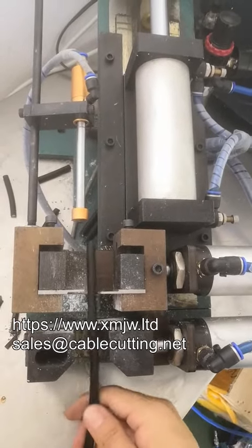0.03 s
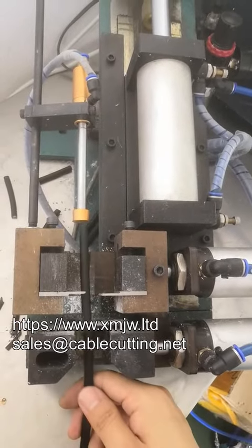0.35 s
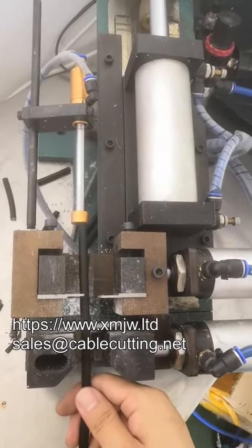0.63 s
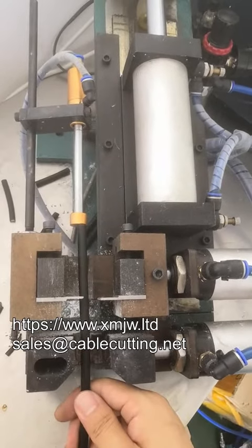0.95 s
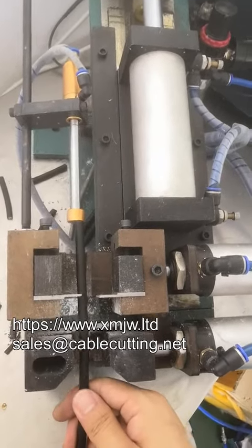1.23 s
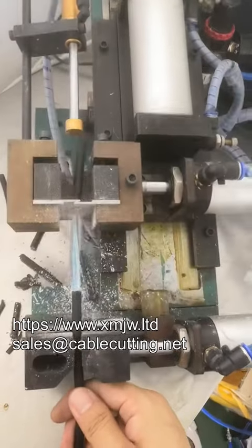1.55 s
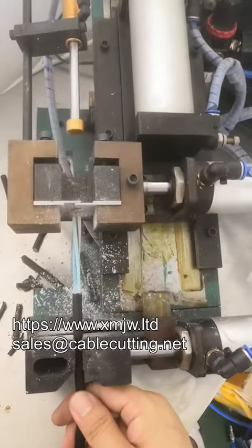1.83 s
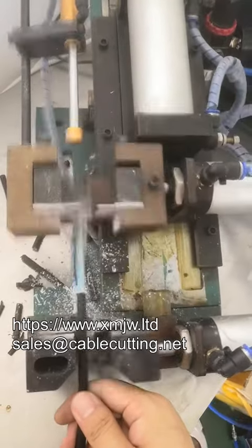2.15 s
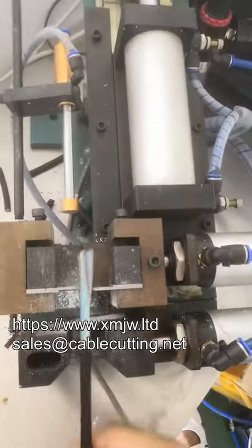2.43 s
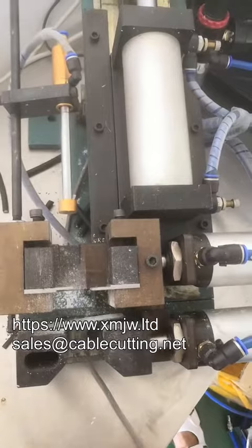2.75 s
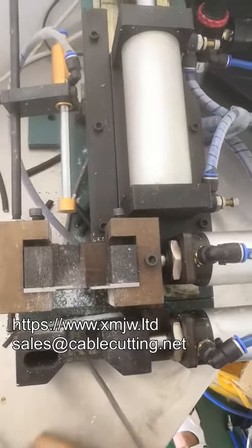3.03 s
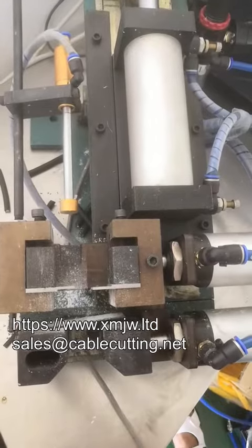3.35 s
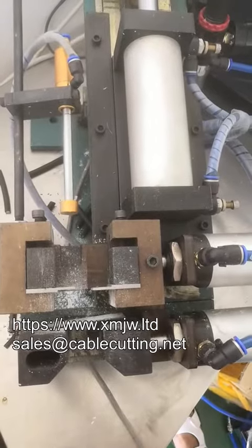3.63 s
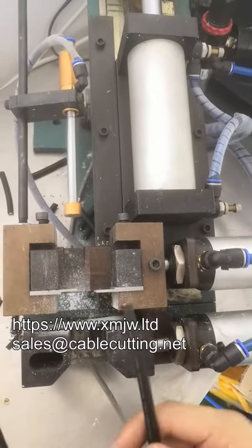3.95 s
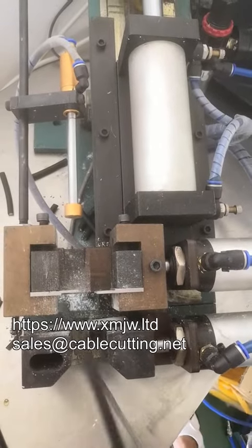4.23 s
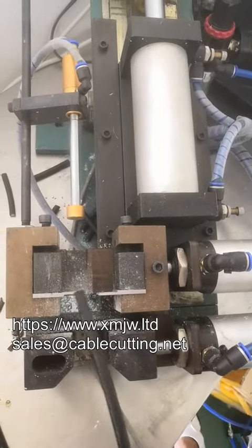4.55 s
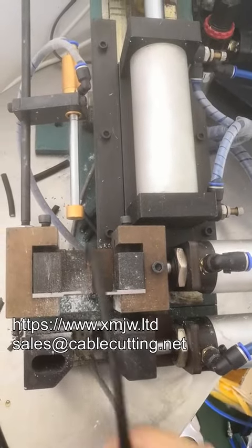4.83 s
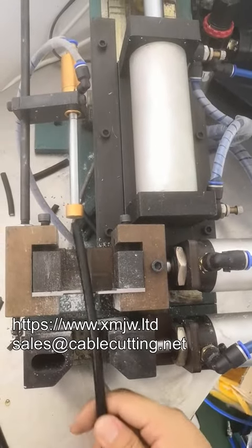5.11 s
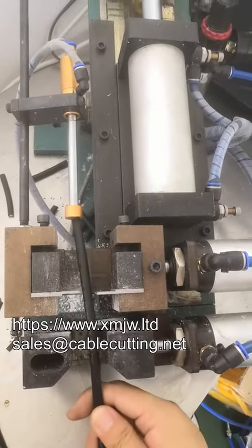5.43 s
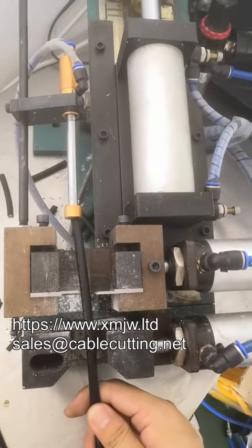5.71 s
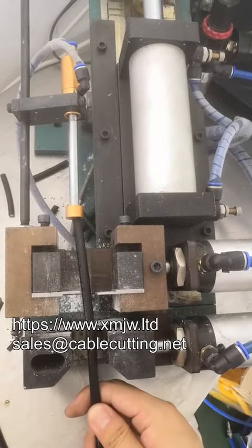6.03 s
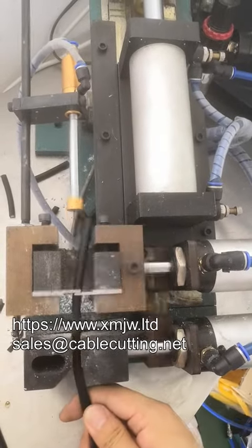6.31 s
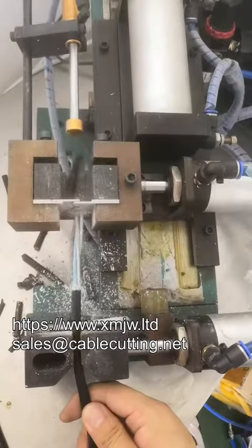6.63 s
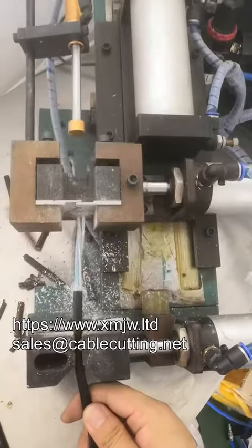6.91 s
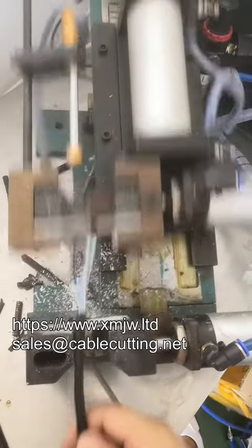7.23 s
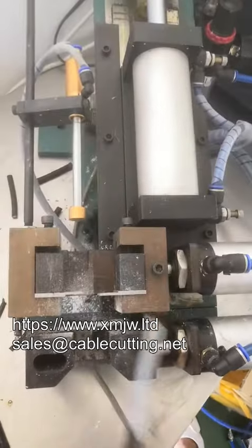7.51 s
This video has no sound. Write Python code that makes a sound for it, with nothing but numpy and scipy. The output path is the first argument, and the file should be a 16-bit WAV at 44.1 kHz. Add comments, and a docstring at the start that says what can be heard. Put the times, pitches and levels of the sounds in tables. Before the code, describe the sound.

Over steady machinery hum, a pneumatic machine pulls and returns twice, each stroke a metallic click, a burst of air and a thud.

```python
"""In a workshop, an air-driven wire stripper on a bench strips two cables: twice it clamps and pulls
back, then returns. In every stroke a solenoid (an electric magnet) clicks, the valve's sliding spool
snaps over and the hoses thump. Air blasts from the jaw cylinder and hisses on from the long one, until
the carriage runs into its buffer and rocks the bench.
A few bouncing knocks and faint squeaks sound over the hum of the shop."""
import sys
import numpy as np
from scipy import signal
from scipy.fft import rfft, irfft, next_fast_len
from scipy.io import wavfile
from scipy.ndimage import uniform_filter1d, map_coordinates

SR = 44100
rng = np.random.default_rng(int(sys.argv[2]) if len(sys.argv) > 2 else 0)


def bounce(signal):
    """Save signal as a 16-bit WAV file at the path given by the first command-line argument."""
    frames = np.transpose(np.atleast_2d(signal))
    limited = np.clip(frames, -1, 1)
    pcm = np.round(limited * 32767).astype(np.int16)
    wavfile.write(sys.argv[1], SR, pcm)


N = 338247
TIME = np.arange(N) / SR
SIZE = next_fast_len(N + SR)
HZ = np.maximum(np.arange(SIZE // 2 + 1) * SR / SIZE, 1)
MIC_GAP_S = 0.000483   # time sound takes from one microphone to the other

# The strokes. Each row: when the valve opens in seconds, how much earlier the solenoid clicks in
# seconds, travel time in seconds, then the levels of valve clicks, air blast and hose thump in dB.
PULLS = [(1.2237, 0.019, .308, -3.5, -14.5, -16.5), (6.1865, 0.02, 0.3, -2.5, -13, -11.5)]
RETURNS = [(2.067, 0.014, 0.23, -2.5, -15, -15), (7.11, 0.017, .238, -6.5, -12.5, -15)]
# The course of every pull and every return: timing and levels of air, clicks, jaws and buffer.
# Names with _s or _t60 are in seconds (t60 is the time to fade by 60 dB), _db in dB, _db_per_s in dB
# per second. A tilt is in dB per octave: the higher it is, the brighter the sound.
PULL = dict(jaw_s=.076, plate_echo_db=-12, open_s=0.00077, surge_db=2.5, surge_s=0.02, sag_db=3, shut_db_per_s=910, hiss_db=-24.5, swell_s=0.054, end_db=-17, fade_db_per_s=311, solenoid_db=-21, solenoid_tilt_db=4.5, spool_lead_s=0.012, spool_t60=0.02, spool_tilt_db=-2.5, bounce_s=.003, bounce_db=-8, thump_lead_s=0.0037, jaw_thud_db=-32, jaw_thud_lag_s=0.0024, buffer_db=-21, buffer_t60=0.26, buffer_tilt_db=-8.5, rattle_db=-36)
RETURN = dict(jaw_s=0.067, plate_echo_db=-19, open_s=0.0085, surge_db=4.5, surge_s=0.021, sag_db=0.5, shut_db_per_s=450, hiss_db=-27, swell_s=0.14, end_db=-16.5, fade_db_per_s=346, solenoid_db=-11.5, solenoid_tilt_db=0, spool_lead_s=-.0005, spool_t60=0.016, spool_tilt_db=-6.5, bounce_s=.007, bounce_db=-11.5, thump_lead_s=0.00056, jaw_thud_db=-26.5, jaw_thud_lag_s=.012, buffer_db=-26.5, buffer_t60=0.15, buffer_tilt_db=-7, rattle_db=-29)
STROKES = [(PULL, row) for row in PULLS] + [(RETURN, row) for row in RETURNS]


def from_db(db):
    """Turn decibels into a gain."""
    return 10 ** (np.asarray(db) / 20)


def rms_one(x):
    """Scale a signal to an average power of 1."""
    return x / np.sqrt(np.mean(x ** 2) + 1e-20)


def at_hz(points, hz):
    """Read between the rows of a (Hz, value) table, with octaves evenly spaced."""
    known_hz, value = np.transpose(points)
    return np.interp(np.log(hz), np.log(known_hz), value)


def through(x, response):
    """Pass a sound through something, given how it answers a single click."""
    return irfft(rfft(x, SIZE) * rfft(response, SIZE), SIZE)[..., :N]


def body(colour, peaks=(), tilt_db=0, size=8192):
    """How an object with this tone colour, these resonances and this tilt answers a click; energy 1."""
    hz = np.maximum(np.arange(size // 2 + 1) * SR / size, 1)
    db = at_hz(colour, hz) + tilt_db * np.log2(np.clip(hz, 250, 8000))
    for centre_hz, width_hz, peak_db in peaks:
        db = db + peak_db / (1 + (2 * (hz - centre_hz) / width_hz) ** 2)
    cepstrum = irfft(np.log(from_db(db)))[:size // 2]   # keeping half puts all ringing after the click
    cepstrum[0] = 0
    response = irfft(np.exp(rfft(2 * cepstrum, size)))
    return response / np.linalg.norm(response)


def drift(rate):
    """A random wander of about 1 either way that turns `rate` times a second."""
    knots = rng.standard_normal(4000)
    return rms_one(np.interp(TIME * rate, np.arange(len(knots)), knots))


def add(track, s, sound):
    """Mix a sound in, starting at s seconds."""
    start = int(s * SR)
    track[start:start + len(sound)] += sound[:N - start]


def diffuse(length):
    """Noise from all directions: alike at both microphones in the bass, unrelated in the treble."""
    mid, side = rfft(rng.standard_normal((2, length)))
    alike = np.sinc(2 * MIC_GAP_S * np.arange(len(mid)) * SR / length)
    return irfft(np.sqrt(1 + alike) * mid + np.sqrt(1 - alike) * side * [[1], [-1]], length)


def steer(pair, balance, radians=0):
    """Give the left microphone its own level and phase at each frequency."""
    left = from_db(at_hz(balance, HZ))
    gains = np.array([left * np.exp(1j * radians), np.ones_like(HZ)]) / np.sqrt((1 + left ** 2) / 2)
    return irfft(rfft(pair, SIZE) * gains, SIZE)[:, :N]


def shop_hum(split_hz=590, mean_hiss_db=-42.5):
    """Running machinery: rumble and hiss rise and fall together, and wavering motor tones swell once."""
    # The shop's tone colour. Each row: frequency in Hz, relative level in dB.
    colour = [(12, -46.5), (20, -9.5), (70, -4.5), (98, -6), (180, -6), (227, -16.5), (300, -16),
              (452, -28.5), (1160, -20.5), (1800, -15), (1940, -16), (2570, -18), (5000, -32),
              (6790, -28.5), (9000, -53), (11700, -121), (19800, -120)]
    # Its resonances. Each row: frequency in Hz, width in Hz, boost in dB.
    peaks = [(1880, 590, 2.5), (2530, 280, 2), (5700, 150, 6)]
    # The rumble over time. Each row: time in seconds, level in dB.
    levels = [(0, -40), (1.1, -40), (2.6, -37.5), (3.15, -41), (3.85, -39.5), (4.4, -41.5), (5.3, -40.5),
              (7.67, -35.5)]
    # Humming and whining motors. Each row: pitch in Hz, width in Hz, level outside the swell in dB.
    motors = [(69.2, 8, -49.5), (127.1, 3.2, -58), (246.5, 5.6, -74.5), (311.6, 3, -65.5),
              (1837, 19, -56.5), (1800, 7.8, -72)]
    # Where the hum sits. Each row: frequency in Hz, left level minus right in dB.
    balance = [(180, 1), (320, -11.5), (570, 7.5), (1000, -3), (1800, -2), (3100, -2), (5500, 1)]
    rumble_db = np.interp(TIME, *np.transpose(levels))
    hiss_db = mean_hiss_db + rumble_db - rumble_db.mean()
    noise = rfft(diffuse(SIZE)) * rfft(body(colour, peaks), SIZE)
    bass = 1 / (1 + (HZ / split_hz) ** 4)
    rumble = rms_one(irfft(noise * bass, SIZE)[:, :N]) * from_db(rumble_db - 0.36 * drift(27))
    hiss = rms_one(irfft(noise * (1 - bass), SIZE)[:, :N]) * from_db(hiss_db + drift(20))
    bands = sum(from_db(db) * rms_one(1 / (1 + (2 * (HZ - hz) / width) ** 2)) for hz, width, db in motors)
    tones = irfft(rfft(diffuse(SIZE)) * bands, SIZE)[:, :N]
    swell = from_db(5.5 * np.exp(-((TIME - 5.25) / 0.55) ** 2))   # 5.5 dB up at 5.25 seconds
    return steer(rumble + hiss + swell * tones, balance)


def squeaks(length_s=0.081, sag_hz=40, waver=0.0703):
    """Something rubs before each pull, making short unsteady tones that slide down."""
    # Each row: start in seconds, starting pitch in Hz, level in dB.
    rubs = [(0.902, 1077, -52), (0.966, 940, -54), (5.959, 1097, -51), (6.1, 1025, -47)]
    out, wobble = np.zeros(N), 1 + waver * drift(430)
    for s, start_hz, db in rubs:
        progress = np.clip((TIME - s) / length_s, 0, 1)
        hz = (start_hz - sag_hz * progress) * wobble
        out += from_db(db) * 2 * np.sin(np.pi * progress) * np.sin(2 * np.pi * np.cumsum(hz) / SR)
    return out


def contacts(hits, colour, crack):
    """Hard parts meet: each hit is a sharp crack and a short dense rattle, coloured by the struck body."""
    out, t = np.zeros(N), TIME[:SR // 4]
    for s, db, t60, tilt_db in hits:
        rattle = (rng.standard_normal(len(t)) + crack * (t == 0)) * from_db(db - 60 * t / t60)
        add(out, s, signal.fftconvolve(rattle, body(colour, tilt_db=tilt_db)))
    return out


def knocks_and_thuds(rattle_lag_s=0.047):
    """Things knock about the shop; in each stroke the jaws thud on the carriage and loose parts chatter."""
    # Knocks and bounces. Each row: start in seconds, level in dB, t60 in seconds, tilt in dB per octave.
    knocks = [(0.939, -36, 0.075, 5), (3.0633, -15.5, 0.043, 3.5), (3.068, -16.5, 0.0086, 1),
              (3.0685, -20.5, 0.019, 9.5), (3.0775, -22.5, 0.069, -3), (3.097, -23.5, 0.076, -4.5),
              (3.144, -35, 0.05, 2.5), (3.179, -30, 0.057, -0.5), (6.126, -34, 0.048, -2),
              (6.824, -19.5, 0.065, -2), (6.8245, -26.5, 0.048, 5.5), (6.837, -24.5, 0.14, -4),
              (6.894, -19, 0.032, 4), (6.905, -26.5, 0.14, 0.5), (6.948, -25, 0.061, 0.5)]
    # Tone colour of the struck things. Each row: frequency in Hz, relative level in dB.
    colour = [(90, -15.5), (170, -6.5), (300, 0.5), (500, -10.5), (800, -4.5), (1200, -0.5), (1800, 2),
              (2900, -4), (4000, -16), (6000, -20.5), (9000, -49)]
    thuds = []
    for course, (s, _, travel_s, *_) in STROKES:
        thuds.append((s + course["jaw_s"] + course["jaw_thud_lag_s"], course["jaw_thud_db"], 0.14, -10))
        thuds.append((s + travel_s + rattle_lag_s, course["rattle_db"], 0.42, 0.5))
    return contacts(knocks + thuds, colour, crack=1.3)


def steel_clicks(buffer_lead_s=0.0053):
    """The solenoid clicks, the spool snaps and bounces, the jaws clack, the carriage hits its buffer."""
    # The jaws meet their stop as their air blast ends.
    # Each row: start in seconds, level in dB, t60 in seconds, tilt in dB per octave.
    jaw_clacks = [(1.2975, -6, .014, -1), (2.1275, -13, .01, -1), (6.2615, -7, .016, 0),
                  (7.171, -12, .01, -1)]
    # Tone colour of the steel parts. Each row: frequency in Hz, relative level in dB.
    colour = [(150, -58.5), (400, -15.5), (1100, -7), (1650, 8), (2400, 7), (3400, 0), (5000, 8.5),
              (7500, -3.5), (9500, -18), (11000, -77.5)]
    hits = []
    for course, (s, solenoid_lead_s, travel_s, db, _, _) in STROKES:
        spool_s = s - course["spool_lead_s"]
        buffer_s = s + travel_s - buffer_lead_s   # just before the carriage stops
        hits.append((s - solenoid_lead_s, db + course["solenoid_db"], 0.055, course["solenoid_tilt_db"]))
        hits.append((spool_s, db, course["spool_t60"], course["spool_tilt_db"]))
        hits.append((spool_s + course["bounce_s"], db + course["bounce_db"], course["spool_t60"], -3))
        hits.append((buffer_s, course["buffer_db"], course["buffer_t60"], course["buffer_tilt_db"]))
    return contacts(hits + jaw_clacks, colour, crack=3.8)


def hose_thumps():
    """The sudden step in air pressure makes the hoses ring for a few cycles."""
    # The hoses' tones. Each row: pitch in Hz, relative level in dB, t60 in seconds.
    tones = [(289.3, 5, 0.046), (336, -19.5, 0.022), (710, 7.5, 0.0058)]
    out, t = np.zeros(N), TIME[:SR // 4]
    ring = sum(from_db(db - 60 * t / t60) * np.sin(2 * np.pi * hz * t) for hz, db, t60 in tones)
    for course, (s, *_, thump_db) in STROKES:
        add(out, s - course["thump_lead_s"], from_db(thump_db) * ring)
    return out


def jaw_blast(t, blast_db, course):
    """Air flow from the short cylinder: it starts with a surge and dies as soon as the jaws are home."""
    times = [course["surge_s"] / 2, course["surge_s"], course["jaw_s"]]
    db = blast_db + np.interp(t, times, [course["surge_db"], 0, -course["sag_db"]])
    fade_db = course["shut_db_per_s"] * np.maximum(t - course["jaw_s"], 0)
    return np.clip(t / course["open_s"], 0, 1) * from_db(db - fade_db)


def long_exhaust(t, travel_s, course):
    """Air flow from the long cylinder: it lasts the whole travel and grows as the piston gathers speed."""
    hiss_db, end_db = course["hiss_db"], course["end_db"]
    times = [course["jaw_s"], travel_s - course["swell_s"], travel_s]
    db = np.interp(t, times, [hiss_db, (hiss_db + end_db) / 2, end_db])
    fade_db = course["fade_db_per_s"] * np.maximum(t - travel_s, 0)
    return np.clip(t / course["open_s"], 0, 1) * from_db(db - fade_db)


def jet(flow, port, peaks, alike=0.7, dip_width_hz=150, dip_s=.075):
    """A sputtering, hollow hiss with ringing tones; random narrow dips come and go in it."""
    white = rng.standard_normal((3, len(flow)))
    pair = np.sqrt(alike) * white[0] + np.sqrt(1 - alike) * white[1:]   # left and right share a part
    hz, s, spectra = signal.stft(pair, SR, nperseg=1024)
    grid = np.meshgrid(hz / dip_width_hz, s / dip_s, indexing="ij")
    chance = map_coordinates(rng.standard_normal((160, 32)), grid)
    dips = from_db(4.5 * np.minimum(chance, .7))   # rises are capped, so the dips stand out
    noise = signal.istft(spectra * dips, SR, nperseg=1024)[1][:, :len(flow)]
    sputter = from_db(1.45 * drift(260)[:len(flow)])
    return signal.fftconvolve(rms_one(noise) * sputter * flow, body(port, peaks)[None])


def vent(strokes, whistles, course, jaw_port, jaw_peaks, long_port, long_peaks, echo_s=.002222):
    """Both cylinders let out air in each stroke; an echo off a nearby plate hollows the hiss a little."""
    out, t = np.zeros((2, N)), TIME[:SR]
    for (s, _, travel_s, _, blast_db, _), whistle in zip(strokes, whistles):
        blast = jet(jaw_blast(t, blast_db, course), jaw_port, [*jaw_peaks, *whistle])
        hiss = jet(long_exhaust(t, travel_s, course), long_port, [*long_peaks, *whistle])
        for track, sound in zip(out, blast + hiss):
            add(track, s, sound)
    echo_gain = from_db(course["plate_echo_db"])
    return (out + echo_gain * np.roll(out, round(echo_s * SR), axis=1)) / np.hypot(1, echo_gain)


def escaping_air():
    """Each cylinder has one air outlet (port) for pulls and one for returns, each with its own sound."""
    # Tone colours of the jaw cylinder's ports (clamp, unclamp) and the long one's (pull, return).
    # Each row: frequency in Hz, relative level in dB.
    clamp_port = [(100, -27.5), (280, -10), (520, -21), (850, -15), (1250, -21), (1650, -3.5), (2600, 0),
                  (3500, 1), (4600, -4.5), (5700, -1), (7000, -7), (8000, -9), (9000, -15), (9900, -45)]
    unclamp_port = [(100, -35), (280, -3.5), (520, -16.5), (850, -11.5), (1250, -15), (1650, -7.5),
                    (2600, 2), (3500, -7), (4600, -4.5), (5700, -4), (7000, -13), (8000, -13), (9000, -49),
                    (9900, -57)]
    pull_port = [(100, -33.5), (280, -10.5), (520, -22.5), (850, -13), (1250, -15.5), (1650, -1.5),
                 (2600, -2), (3500, -2.5), (4600, -10), (5700, -3.5), (7000, -13.5), (8000, -12),
                 (9000, -31.5), (9900, -67)]
    return_port = [(100, -29), (280, -7.5), (520, -23.5), (850, -12.5), (1250, -15), (1650, 0.5),
                   (2600, -4), (3500, 2.5), (4600, -8.5), (5700, -12), (7000, -5.5), (8000, -19),
                   (9000, -32.5), (9900, -63.5)]
    # The ports' resonances and dips. Each row: frequency in Hz, width in Hz, boost or cut in dB.
    clamp_peaks = [(1595, 130, 7.5), (2510, 170, -10), (3300, 200, 2), (4730, 160, -12.5), (5960, 110, 5),
                   (6330, 330, -12), (6990, 280, 8)]
    unclamp_peaks = [(1780, 240, 11), (2190, 170, 6), (2450, 194, -0.5), (2570, 120, 3.5), (3290, 57, -3.5),
                     (3460, 410, 9), (3667, 29, -15), (4080, 50, 2), (5700, 65, -11), (5810, 141, 2.5),
                     (6320, 100, -18.0), (6760, 240, 9.6), (7050, 54, -18.5), (7560, 87, 14)]
    pull_peaks = [(2090, 110, 4), (2210, 220, -6.5), (4260, 160, 1), (4230, 160, -1), (4850, 140, -3),
                  (5990, 120, -5), (6380, 390, -9.5), (6950, 260, 10)]
    return_peaks = [(1808, 43, 3.5), (2130, 190, 4.5), (2320, 50, -1), (2550, 310, 8.0), (3320, 170, 0.5),
                    (3410, 300, -1), (3760, 280, -6.5), (4180, 76, -8), (5290, 470, 11), (5620, 53, -10),
                    (5690, 240, 7), (6900, 170, -4.5), (7900, 440, 10.5)]
    # The air half whistles, with one list per stroke. Each row: pitch in Hz, width in Hz, boost in dB.
    pull_whistles = [
        [(1634, 63, 5.5), (3080, 76, -0.5), (4900, 80, 4), (5870, 46, 8)],
        [(1768, 51, 7.5), (2800, 40, 1), (3290, 120, -0.5), (4580, 90, 4.5)],
    ]
    return_whistles = [
        [(2530, 80, 1.8), (3400, 80, 1), (4000, 72, 5.6), (6800, 90, 3)],
        [(2634, 84, 7.4), (3330, 42, 4.4), (3860, 170, 6.7), (5350, 59, 4.8)],
    ]
    pull = vent(PULLS, pull_whistles, PULL, clamp_port, clamp_peaks, pull_port, pull_peaks)
    back = vent(RETURNS, return_whistles, RETURN, unclamp_port, unclamp_peaks, return_port, return_peaks)
    return pull + back


def bench_rumble(rise_s=0.037, width_hz=57.0, resonance_db=24.5):
    """The carriage jolts the bench at its buffer and rocks back unevenly; each jolt makes it rumble."""
    # Cushioned blows. Each row: time of the peak in seconds, level in dB, tilt in dB per octave.
    jolts = [(1.518, -21.5, 3.5), (1.56, -32, 14), (1.593, -22.5, 8), (1.632, -26, -1.5), (1.72, -33, 3),
             (2.33, -21, -1.5), (2.378, -32.5, 11.5), (2.43, -32, -7), (2.48, -32.5, -11), (6.49, -22.5, 2),
             (6.522, -26.5, 10), (6.565, -30, 2), (6.605, -27, 3.5), (6.67, -36.5, -6), (6.715, -34.5, -1),
             (7.347, -25.5, 0), (7.378, -26, -2), (7.43, -30.5, 9), (7.48, -28.5, 0), (7.54, -30, -1),
             (7.58, -51, -2)]
    # The bench's resonances. Each row: frequency in Hz, relative level in dB, t60 in seconds.
    resonances = [(60.4, -6.5, 0.28), (121.3, -3, 0.4), (183, -7, 0.24), (279.2, -17, 0.22)]
    # The rumble's tone colour. Each row: frequency in Hz, relative level in dB.
    colour = [(30, -20), (55, -2), (130, 0), (200, -1), (300, -6), (370, -24), (500, -40), (900, -46)]
    out, t = np.zeros(N), TIME[:SR] - rise_s
    for hz, db, t60 in resonances:
        rumble = through(rng.standard_normal(N), body(colour, [(hz, width_hz, resonance_db)]))
        rumble /= np.sqrt(uniform_filter1d(rumble ** 2, SR // 30) + 1e-9)   # even out its level
        blow = np.clip(1 + t / rise_s, 0, 1) * from_db(-60 * np.maximum(t, 0) / t60)
        power = np.zeros(N)
        for s, jolt_db, tilt_db in jolts:
            gain = from_db(db + jolt_db + tilt_db * np.log2(hz / 134))   # the tilt pivots at 134 Hz
            add(power, s - rise_s, (gain * blow) ** 2)
        out += rumble * np.sqrt(power)
    return out


def near_echoes(x, lead_s, echo_db, spread_s, scatter_s, count=60):
    """The direct sound arrives lead_s earlier on the left; echoes off the machine come from all sides."""
    lateness, side = rng.random(count), rng.uniform(-1, 1, count)
    echoes = rng.choice([-1, 1], count) * np.exp(-2 * lateness)
    gains = np.r_[1, from_db(echo_db) * echoes / np.linalg.norm(echoes)]
    delay = np.r_[0, 2 * MIC_GAP_S + lateness * spread_s]
    lead = np.r_[lead_s, side * scatter_s]
    response = np.zeros((2, SR // 4))
    for channel, sign in enumerate((-1, 1)):
        arrival_s = delay + np.maximum(sign * lead, 0)
        np.add.at(response[channel], (arrival_s * SR).astype(int), gains)
    return through(x, response / np.linalg.norm(gains))


def room_echo(x, build_s=0.0012):
    """The workshop rings on: echoes from all around build up, then each octave fades at its own pace."""
    # Each row: frequency in Hz, time to fade by 60 dB in seconds.
    fade_times = [(100, 0.19), (500, 0.78), (2000, 0.63), (4000, 0.84), (9000, 0.32)]
    t, noise, tail = TIME[:SR], rfft(diffuse(SR)), 0
    octave = np.log2(np.maximum(np.arange(noise.shape[1]), 64))
    for k in range(6, 15):
        band = irfft(noise * np.maximum(1 - abs(octave - k), 0), SR)
        tail = tail + band * from_db(-60 * t / at_hz(fade_times, 2 ** k))
    tail = tail * (1 - np.exp(-t / build_s))
    return through(x, tail / np.linalg.norm(tail[0]))


def scene():
    """The machine close by and the knocks further off, all in one humming workshop."""
    # Where the machine's sound sits. Each row: frequency in Hz, left level minus right in dB.
    balance = [(300, 0.5), (1200, -0.5), (1700, -12.5), (2100, 0.5), (2600, -6), (3400, -4), (4100, -4.5),
               (5100, 9.5), (5900, -4), (9000, 2.5)]
    # Its sound bends round the microphones' case. Each row: frequency in Hz, the left's lead in radians.
    phase_lead = [(200, 1), (550, 2.5), (900, 0.8), (1300, 2.34), (1650, -0.7), (1900, 5), (2450, 3),
                  (2750, 7), (3000, 6.5), (3350, 5.5), (3800, 10), (4800, 10), (5900, 7.5), (6600, 9),
                  (7400, 14), (8100, 14)]
    hiss, clicks, thumps = escaping_air(), steel_clicks(), hose_thumps()
    far = knocks_and_thuds() + squeaks()
    air = near_echoes(hiss, lead_s=0, echo_db=-8, spread_s=.022, scatter_s=.00025)
    steel = near_echoes(clicks, lead_s=0, echo_db=-10, spread_s=.006, scatter_s=.0004)
    machine = steer(air + steel, balance, at_hz(phase_lead, HZ))
    low = near_echoes(thumps + bench_rumble(), lead_s=.0004, echo_db=-14, spread_s=.021, scatter_s=.00045)
    distant = near_echoes(far, lead_s=.0001, echo_db=3.0, spread_s=0.024, scatter_s=0.00038)
    room = room_echo(from_db(-12.5) * (hiss + clicks) + from_db(-27.0) * thumps + from_db(-8.0) * far)
    return machine + low + distant + room + shop_hum()


def record(dry):
    """Move the bass to the middle, round off the loudest peaks and cut the highest treble."""
    mono_below_hz, cutoff_hz = 200, 9900
    mid, side = (dry[0] + dry[1]) / 2, (dry[0] - dry[1]) / 2
    side = irfft(rfft(side, SIZE) / (1 + (mono_below_hz / HZ) ** 4), SIZE)[:N]
    rounded = .8 * np.tanh(np.array([mid + side, mid - side]) / .8)
    return signal.sosfilt(signal.ellip(10, .2, 70, cutoff_hz, fs=SR, output="sos"), rounded)


dry = scene()
out = record(dry)
bounce(out)
```